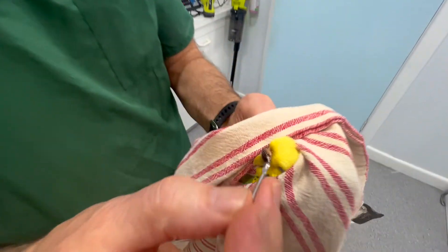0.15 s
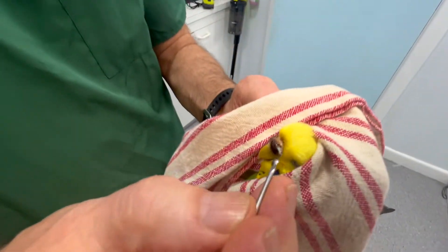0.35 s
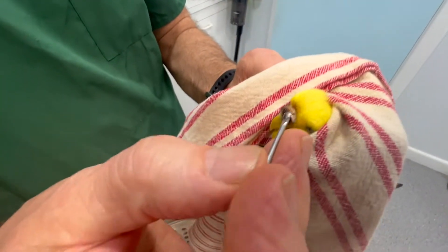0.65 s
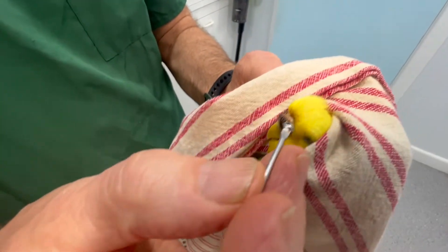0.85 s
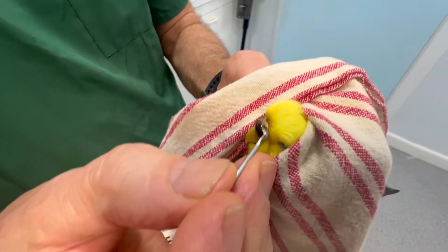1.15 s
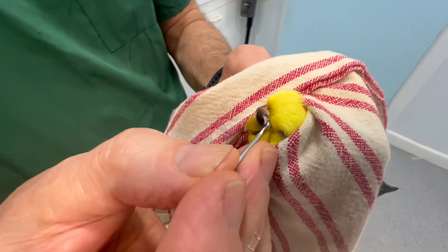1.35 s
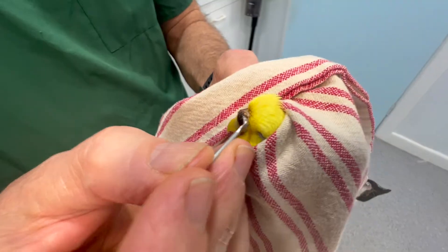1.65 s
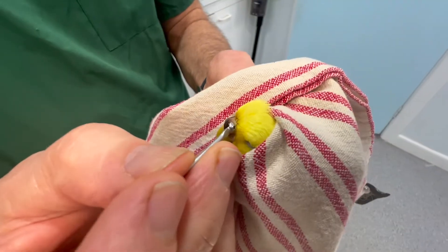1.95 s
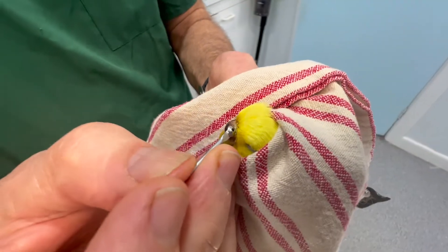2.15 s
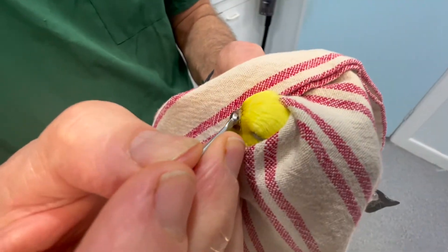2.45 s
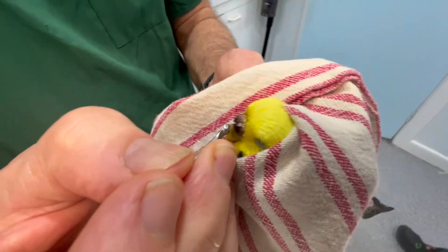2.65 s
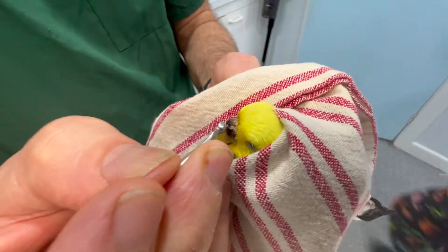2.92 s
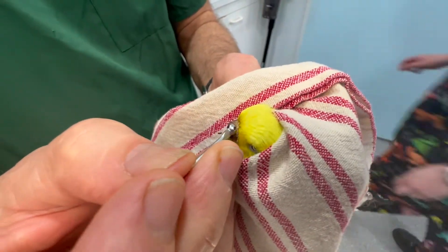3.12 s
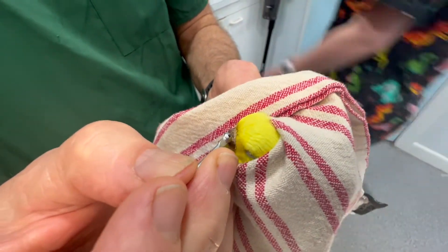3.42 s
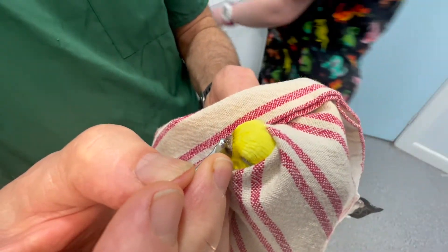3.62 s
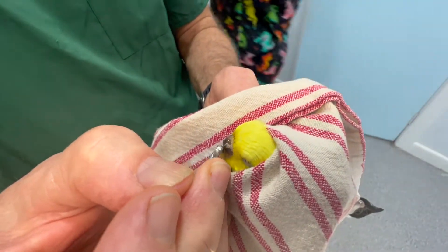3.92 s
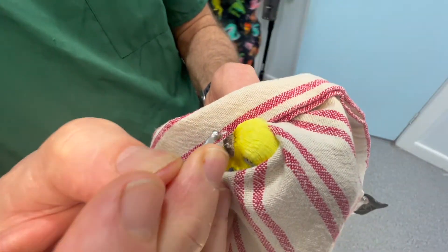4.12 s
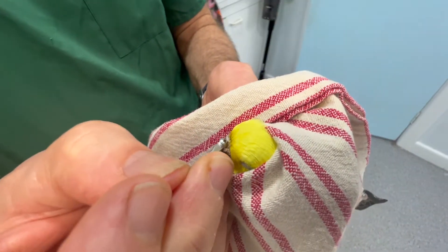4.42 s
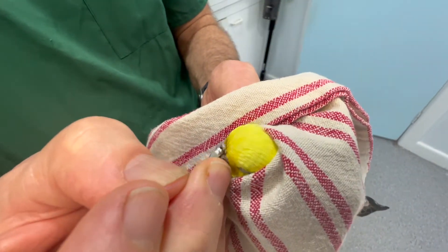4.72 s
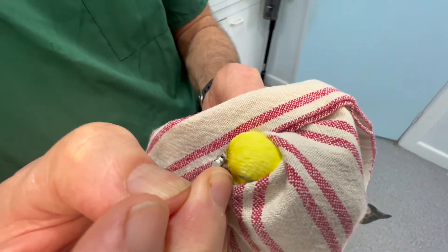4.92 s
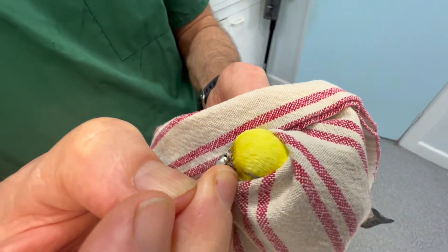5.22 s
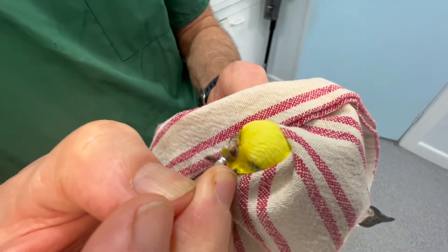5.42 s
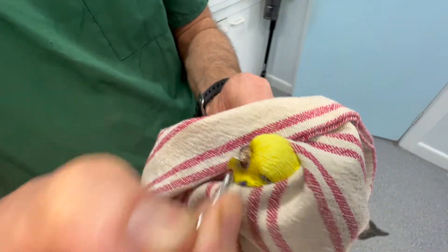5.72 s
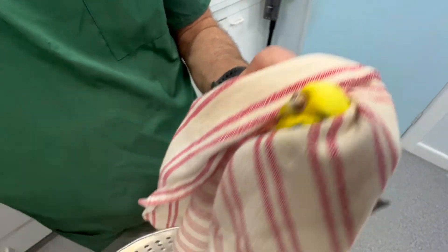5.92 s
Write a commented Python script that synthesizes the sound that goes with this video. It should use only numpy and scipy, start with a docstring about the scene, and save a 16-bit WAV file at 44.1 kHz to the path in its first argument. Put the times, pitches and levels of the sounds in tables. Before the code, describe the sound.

A small parrot squawks about seventeen times close to the microphone in a hard-walled room. Each call is short, high and raspy, arching up in pitch and then dropping, with a brief reverberation. The calls come roughly three a second, the loudest slightly overloading the microphone, then soften for a while and pick up again near the end. Underneath, ventilation hums steadily while shoes scuff and heels thud softly on the floor.

```python
"""In a hard-walled room, a small parrot held in a towel squawks seventeen times near a two-port microphone.
The membranes of its syrinx oscillate in a wobbling harmonic series whose pitch arches up and drops.
The room reverberates over a ventilation hum, shoes scuff by friction and heels thud through the floor.
The loudest calls overload the microphone."""
import sys
import numpy as np
from scipy import signal
from scipy.fft import rfft, irfft
from scipy.io import wavfile
from scipy.ndimage import uniform_filter1d

SR = 44100
rng = np.random.default_rng(int(sys.argv[2]) if len(sys.argv) > 2 else 0)


def bounce(signal):
    """Save signal as a 16-bit WAV file at the path given by the first command-line argument."""
    frames = np.transpose(np.atleast_2d(signal))
    limited = np.clip(frames, -1, 1)
    pcm = np.round(limited * 32767).astype(np.int16)
    wavfile.write(sys.argv[1], SR, pcm)


N = 267642
TIME, FREQS = np.arange(N) / SR, np.fft.rfftfreq(N, 1 / SR)


def gain_of(db):
    """Amplitude ratio of a level in decibels."""
    return 10 ** (np.asarray(db) / 20)


def unit_rms(x):
    """Normalisation to rms 1."""
    return x / np.sqrt(np.mean(x ** 2) + 1e-20)


def curve_at(points, hz):
    """Interpolation on a log-frequency axis."""
    f, value = np.transpose(points)
    return np.interp(np.log(hz + 1), np.log(f + 1), value)


def wobble(count, size):
    """Low-pass noise of rms 1, changing about every `size` samples."""
    return unit_rms(signal.oaconvolve(rng.standard_normal(count), np.hanning(2 * size), "same"))


def stereo_noise(spectrum, correlation):
    """Partial coherence: two channels of coloured noise share a common part."""
    left, independent = rfft(rng.standard_normal((2, N)))
    right = correlation * left + np.sqrt(1 - correlation ** 2) * independent
    return unit_rms(irfft(np.array([left, right]) * gain_of(curve_at(spectrum, FREQS)), N))


# Ventilation noise. Each row: frequency in Hz, relative spectrum level in dB.
HUM_SPECTRUM = [(15, -66), (25, -18.5), (141, -9), (276, -14), (475, -23), (513, -22), (1110, -25),
                (2550, -35.5), (2970, -35.5), (3300, -40.5), (4990, -42), (6290, -37.5), (12000, -69.5),
                (15600, -106), (22000, -120)]
# Coherence of the hum. Each row: frequency in Hz, left-right correlation from 0 to 1.
HUM_CORRELATION = [(60, 1), (130, 0.97), (290, 0.69), (640, 0.05), (3000, 0.05)]
# Duct resonances. Each row: centre in Hz, width in Hz, boost in dB.
DUCT_MODES = [(147, 12, 9.5), (191, 19, 9.5)]
def ventilation_hum():
    """Resonance: duct modes reinforce narrow bands of a gently swelling rumble."""
    duct_db = sum(db / (1 + (2 * (FREQS - hz) / width) ** 2) for hz, width, db in DUCT_MODES)
    airflow = stereo_noise(HUM_SPECTRUM, curve_at(HUM_CORRELATION, FREQS))
    rumble = unit_rms(irfft(rfft(airflow) * gain_of(duct_db), N))
    balance_db = np.array([[1.5], [-1.5]])
    return gain_of(-37 + 0.65 * wobble(N, size=4000) + balance_db) * rumble


# The opening reverberation. Each row: frequency in Hz, relative spectrum level in dB.
TAIL_SPECTRUM = [(1180, -51), (2000, -20), (6290, 2), (10100, -23), (10600, -16), (12000, -21),
                 (13300, -73.5), (15000, -33)]
def opening_tail():
    """Exponential decay: the reverberation of a call just before the start loses 130 dB a second."""
    return gain_of(-31.5 - 130 * TIME) * stereo_noise(TAIL_SPECTRUM, correlation=0.14)


def arch(t, times, first, peak, last):
    """Power-law rise and descent, rounded at the peak."""
    before, after = np.interp(t, times[:2], [1, 0]), np.interp(t, times[1:], [0, 1])
    return peak + (first - peak) * before ** 1.5 + (last - peak) * after ** 1.8


def vocal_gesture(start, low_s, hold_s, surge_s, fade_s, sag_s, start_hz, low_hz, flip_hz, top_hz, fall_hz,
                  low_db, flip_db, top_db, fall_db, end_db, second_db, rasp_db, upper_db):
    """Register change: a raspy low voice flips to the high register, surges over a crest and falls back."""
    flip_s, fall_s, snap_s, onset_s, catch_s = .002, .0085, .005, .011, .0014
    flip, surge, loudest, fall = start + np.cumsum([low_s, hold_s, surge_s, fade_s])
    t = np.arange(start - .004, fall + fall_s + .002, 1 / SR)

    def ramp(begin, end):
        return np.interp(t, [begin, end], [0, 1])

    low = 1 - ramp(flip, flip + flip_s)
    caught = ramp(fall, fall + catch_s)  # back in the low register
    high = 1 - low - caught

    snap = 1 - np.exp(-np.maximum(t - start, 0) / snap_s)
    climb = .6 * snap + .4 * ramp(start, flip)
    high_hz = arch(t, [flip, fall - sag_s, fall], flip_hz, top_hz, fall_hz)
    high_hz += (1988 - fall_hz) * ramp(fall, fall + fall_s)  # every call plunges to one pitch
    hz = low * (start_hz + (low_hz - start_hz) * climb) + (1 - low) * high_hz

    swell = np.sin(np.pi / 2 * ramp(surge, loudest)) ** 2
    high_db = flip_db + (top_db - flip_db) * swell + (fall_db - top_db) * ramp(loudest, fall) ** 2
    onset_db = -8 * (1 - ramp(start, start + onset_s))
    effort_db = low * (low_db + onset_db) + high * high_db + caught * end_db
    brightness_db = 0.35 * (high_db - top_db)  # overtones grow with effort
    lifts_db = [(1 - high) * rasp_db + high * (db + brightness_db) for db in (second_db, upper_db)]
    return t, effort_db, hz, lifts_db


def pitch_slips(count, mean_hold_s=.006):
    """A Poisson process: slack membranes slip from one held pitch to the next."""
    jumps = np.cumsum(rng.random(count) < 1 / (mean_hold_s * SR))
    return uniform_filter1d(rng.standard_normal(count)[jumps], size=30)


# Colouring of the overtones by beak and microphone. Each row: frequency in Hz, gain in dB.
BEAK_RESPONSE = [(2500, 0), (4500, 1), (6000, 1.5), (7500, -6), (8800, -7), (10200, -19), (11500, -13.5),
                 (12600, -30.5), (13600, -44), (15000, -32.5), (16500, -40)]
def syrinx(t, effort_db, hz, lifts_db, hoarseness):
    """Source and filter: membranes make six rough harmonics, air hisses past, the beak colours both."""
    count = len(t)
    second_db, upper_db = lifts_db
    tension_deficit = np.maximum(1 - np.maximum.accumulate(hz) / hz.max(), .9 - hz / hz.max())
    slack = .9 * hoarseness * np.minimum(hoarseness + 8 * tension_deficit, 1.4)  # slack sounds scratchy
    jitter = (.003 + .021 * slack) * wobble(count, size=40)
    waver = (.004 + .012 * slack) * wobble(count, size=200)
    slips = .024 * (.35 + slack) * pitch_slips(count)
    hz = hz * (1 + jitter + waver) * (1 + slips)
    phasor = np.exp(2j * np.pi * np.cumsum(hz) / SR)

    gains = [np.ones(count)]
    for k in range(2, 7):
        gains.append(gain_of((second_db if k == 2 else upper_db) + curve_at(BEAK_RESPONSE, k * hz)))
    tone = np.zeros(count)
    for k, gain in enumerate(gains, 1):
        fray = np.clip((k - .6) * (.08 + .45 * slack), 0, .9)  # higher partials break up more
        flutter = (wobble(count, size=45) + 1j * wobble(count, size=45)) / np.sqrt(2)
        tone += gain * ((np.sqrt(1 - fray ** 2) + fray * flutter) * phasor ** k).real
    tone /= np.sqrt(sum(gain ** 2 for gain in gains) / 2)

    air_db = curve_at([(3800, -10)] + BEAK_RESPONSE[2:], np.fft.rfftfreq(count, 1 / SR))
    air = irfft(rfft(rng.standard_normal(count)) * gain_of(air_db), count)
    voice = tone + gain_of(-42.5 + 10 * slack) * unit_rms(air)
    gate = np.clip((t - t[0]) / 0.004, 0, 1) ** 2 * np.clip((t[-1] - t) / 0.003, 0, 1)
    return gain_of(effort_db) * voice * gate


# The calls. Each row: start in seconds; lengths in seconds of the low register, hold, surge, fade and
# pitch sag before the fall; pitch in Hz at the start, before the flip, after it, at the crest and at the
# fall; effort in dB before the flip, after it, at its loudest, at the fall and while falling; lift in dB
# over the fundamental, ahead of the beak, of the second partial, of all overtones in the low register
# and of the upper partials; hoarseness from 0 to 1.
SQUAWKS = [(0.248, 0.03, 0.013, 0.062, 0.02, 0.036, 2037, 2448, 2684, 3040, 2888, -8.5, -11, -10, -8, -7, 1, 8, 3, 0.74),
           (0.777, 0.025, 0.0018, 0.062, 0.023, 0.054, 1890, 2416, 2850.0, 3061, 2897, -8.5, -12.5, -6.5, -8.5, -13, 3, 6.5, 0.5, 0.7),
           (1.163, 0.039, 0.0021, 0.066, 0.025, 0.074, 1735, 2497, 2826, 3022, 2840, -11.5, -10.5, -6.5, -10, -8, 1, 9.5, 1, 0.6),
           (1.436, 0.017, 0.0022, 0.075, 0.03, 0.048, 1835, 2520, 2770, 3134, 2937, -9.5, -11.5, -2.5, -6.5, -13, 3.5, 8, 6, 0.45),
           (1.685, 0.014, 0.0066, 0.056, 0.051, 0.031, 1795, 2490, 2667, 3124, 2895, -8, -16.5, -4.5, -5, -10, 0.5, 6, 3.5, 0.45),
           (1.947, 0.016, 0.002, 0.089, 0.027, 0.037, 1950, 2487, 2600, 3090, 2822, -10, -17.5, -3, -15.5, -15.5, -0.5, 4, 3, 0.4),
           (2.236, 0.0095, 0.02, 0.078, 0.026, 0.036, 1640, 2484, 2527, 3024, 2703, -11.5, -17, -4, -23, -22.5, -1, 1.5, 3, 0.43),
           (2.502, 0.0058, 0.0088, 0.088, 0.046, 0.041, 1750, 2180, 2475, 3007, 2627, -14, -19.5, -4, -8.5, -15, -0.5, 1, 2, 0.4),
           (2.773, 0.0082, 0.029, 0.067, 0.023, 0.03, 1740, 2320, 2428, 3055, 2640, -9, -13.5, -4, -15, -18.5, -0.5, 5, 3, 0.4),
           (3.18, 0.023, 0.014, 0.08, 0.023, 0.044, 1795, 2360, 2455, 2964, 2768, -16.5, -20, -7, -19.5, -23.5, -3, 4, 1, 0.45),
           (3.495, 0.0091, 0.02, 0.068, 0.034, 0.042, 1540, 2380, 2360, 2972, 2595, -20, -22, -8.5, -20, -21.5, -7.5, 2, 1, 0.39),
           (3.794, 0.01, 0.002, 0.1, 0.033, 0.032, 1717, 2390, 2420, 2940, 2455, -22.5, -22.5, -9, -17, -22.5, -6.5, -1, 0.5, 0.4),
           (4.104, 0.011, 0.033, 0.061, 0.026, 0.017, 1610.0, 2240, 2510, 2895, 2600, -16.5, -19, -8.5, -23, -25, -6.5, 4, -1, 0.47),
           (4.548, 0.022, 0.002, 0.079, 0.018, 0.019, 1906, 2390, 2376, 2984, 2520, -25.5, -22, -14.5, -26.5, -36, -15, -5, -3, 0.32),
           (4.969, 0.018, 0.0019, 0.072, 0.048, 0.053, 1710, 2330, 2410.0, 2938, 2530, -24, -22.5, -10.5, -20.5, -28, -14, -3.5, 0, 0.36),
           (5.298, 0.0056, 0.036, 0.079, 0.033, 0.038, 2170, 2350, 2408, 3010.0, 2726, -17.5, -18.5, -4.5, -16.5, -15, -2.5, 3.5, 1.5, 0.45),
           (5.765, 0.05, 0.013, 0.055, 0.025, 0.041, 1516, 2417, 2680, 2970.0, 2877, -12.5, -14, -8, -15.5, -11.5, 1.5, 7.5, -1, 0.55)]
def parrot():
    """Self-sustained oscillation: each gesture drives the syrinx through one squawk."""
    bird = np.zeros(N)
    for *shape, hoarseness in SQUAWKS:
        t, effort_db, hz, lifts_db = vocal_gesture(*shape)
        at = round(t[0] * SR)
        bird[at:at + len(t)] += syrinx(t, effort_db, hz, lifts_db, hoarseness)
    return bird


# The two ports. Each row: frequency in Hz, lag of the right in samples, left over right level in dB.
PORT_DIFFERENCES = [(2356, 9.85, 4), (3240, 14.1, 1), (4970, 12.77, 5.5), (6070, 14.88, -3),
                    (6480, 12, 3.5), (8430, 10.99, 4.5), (11200, 13.19, -2.5), (14500, 10, -2.5)]
def direct_sound(bird):
    """Path difference and acoustic shadow: the right port lies farther off, shaded by the housing."""
    hz = np.fft.rfftfreq(4096, 1 / SR)
    port_hz, lag, db = np.transpose(PORT_DIFFERENCES)
    shading = gain_of(np.interp(hz, port_hz, db) / 2)
    delay = np.exp(-2j * np.pi * hz * np.interp(hz, port_hz, lag) / SR)
    responses = irfft(np.array([shading, delay / shading]))
    taps = np.roll(responses, 100, axis=1)[:, :201] * np.hanning(201)
    return signal.oaconvolve(np.array([bird, bird]), taps, "same", axes=1)


# Decay of the room. Each row: frequency in Hz, time to fall 60 dB in seconds.
REVERB_TIMES = [(1500, 0.19), (3000, 0.44), (5000, .48), (9000, 0.36), (11500, 0.12)]
def reverberation(bird):
    """Diffuse reflection: echoes of random sign die away, each band at its own rate."""
    echoes = np.zeros((2, SR))
    arrivals = np.arange(200, SR - 20, 20) + rng.integers(0, 20, (2, (SR - 201) // 20))
    np.put_along_axis(echoes, arrivals, rng.choice([-1., 1.], arrivals.shape), 1)
    hz, t, bands = signal.stft(echoes, SR, nperseg=256)
    early_boost = 1 + 10.6 * np.exp(-t / 0.0067)  # towel, hands and nearby walls
    decay = gain_of(-60 * t / curve_at(REVERB_TIMES, hz)[:, None])
    response = signal.istft(bands * early_boost * decay, SR, nperseg=256)[1]
    return signal.fftconvolve(bird[None], response / np.linalg.norm(response[0]), axes=1)[:, :N]


# A rubbing sole. Each row: frequency in Hz, relative spectrum level in dB.
SOLE_SPECTRUM = [(60, -15.5), (100, -24), (200, -0.5), (400, -11), (800, -3), (2000, -12), (5000, -28.5),
                 (9000, -31.5), (10500, -81.5)]
# The scuffs. Each row: start in seconds, level in dB, length in seconds.
SHOE_SCUFFS = [(1.169, -27, 0.23), (1.774, -41, 0.046), (2.08, -40.5, 0.32), (2.578, -38.5, 0.025),
               (2.855, -42, 0.027), (3.127, -39, 0.23), (4.158, -32.5, 0.16), (4.884, -61.5, 0.049),
               (5.147, -33.5, 0.23), (5.397, -42, 0.3)]
def shoe_scuffs():
    """Sliding friction: soles rub the floor with a grainy noise that swells quickly and fades."""
    envelope = np.zeros(N)
    for start, db, length in SHOE_SCUFFS:
        progress = np.clip((TIME - start) / length, 0, 9)
        envelope += gain_of(db) * np.minimum(progress * 6, 1) * np.exp(-1.5 * progress ** 2)
    grain = gain_of(2.5 * wobble(N, size=200))
    return envelope * grain * stereo_noise(SOLE_SPECTRUM, correlation=.1)


# Heels landing. Each row: start in seconds, level in dB.
HEEL_STRIKES = [(1.191, -26.5), (2.578, -27.5), (4.452, -30), (5.359, -30)]
def heel_thuds(rise_s=0.0078, decay_s=0.093):
    """Impact sound: each heel sends a dull, damped thud through the floor."""
    envelope = np.zeros(N)
    for start, db in HEEL_STRIKES:
        age = np.maximum(TIME - start, 0)
        envelope += gain_of(db) * np.minimum(age / rise_s, 1) * np.exp(-age / decay_s)
    return envelope * stereo_noise([(40, -16), (180, 17.5), (500, -40.5)], correlation=0.84)


def scene():
    """Superposition: the bird, its reverberation, the footfalls and the hum add at both ports."""
    bird = parrot()
    calls = opening_tail() + direct_sound(bird) + gain_of(-11.5) * reverberation(bird)
    return calls + shoe_scuffs() + heel_thuds() + ventilation_hum()


# Peaks and dips in the high treble, with notches near 10 and 13.5 kHz.
# Each row: frequency in Hz, gain in dB.
TREBLE_COLOUR = [(9400, 1), (10100, -6.5), (10900, 5), (12700, 5.5), (13500, -19), (14400, 1.5)]
def record(dry):
    """Overload: lopsided peaks clip, leaving a low thump; treble colouring and a band limit follow."""
    clipped = np.clip(dry, -.95, .95)
    coloured = irfft(rfft(clipped) * gain_of(curve_at(TREBLE_COLOUR, FREQS)), N)
    lowpass = signal.firwin(511, cutoff=15900, window=("kaiser", 9), fs=SR)
    return signal.oaconvolve(coloured, lowpass[None], "same")


dry = scene()
out = record(dry)
bounce(out)
```